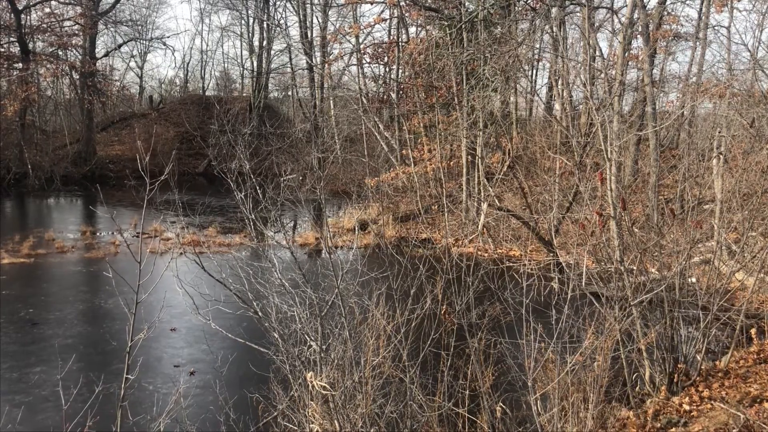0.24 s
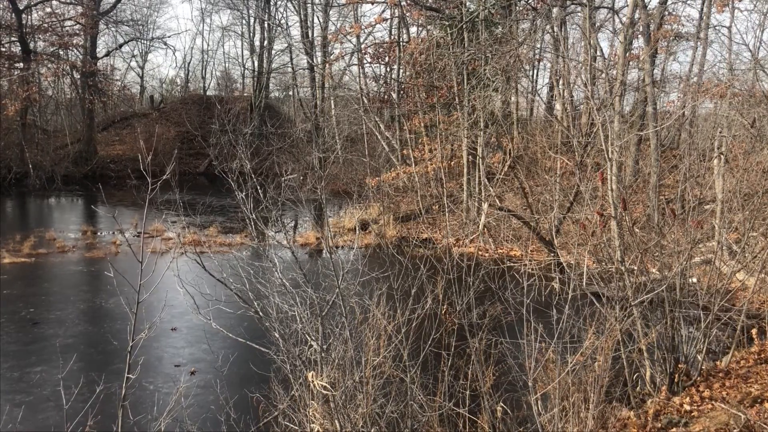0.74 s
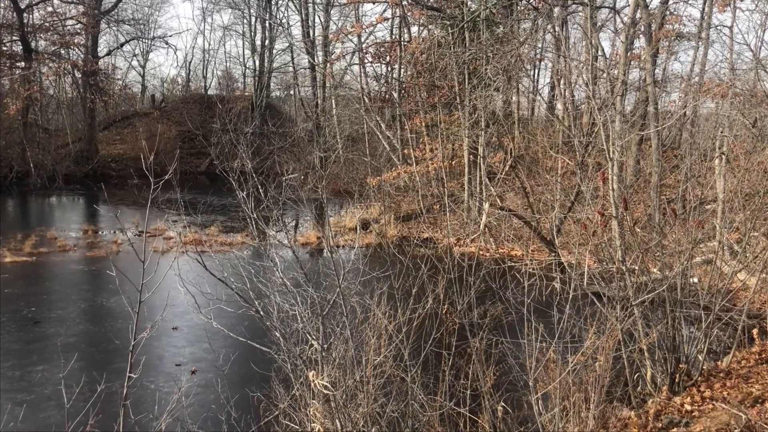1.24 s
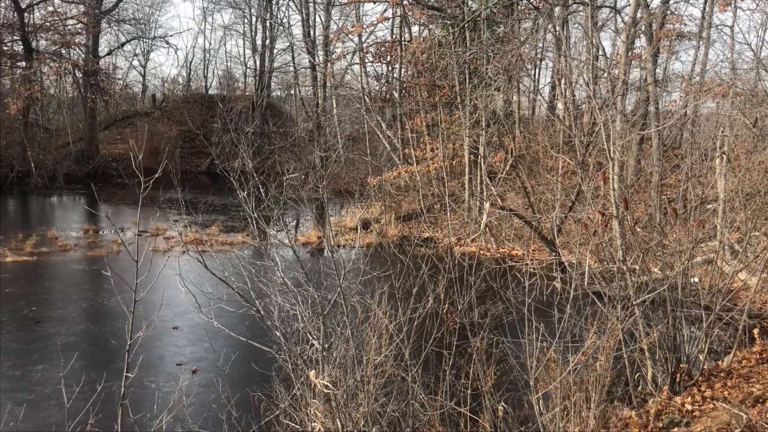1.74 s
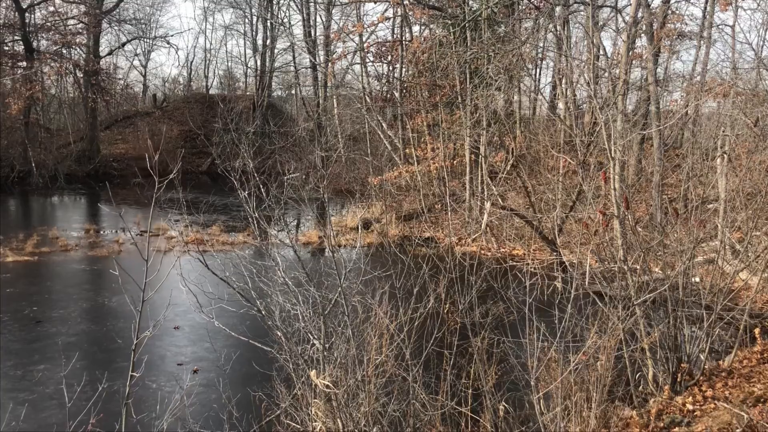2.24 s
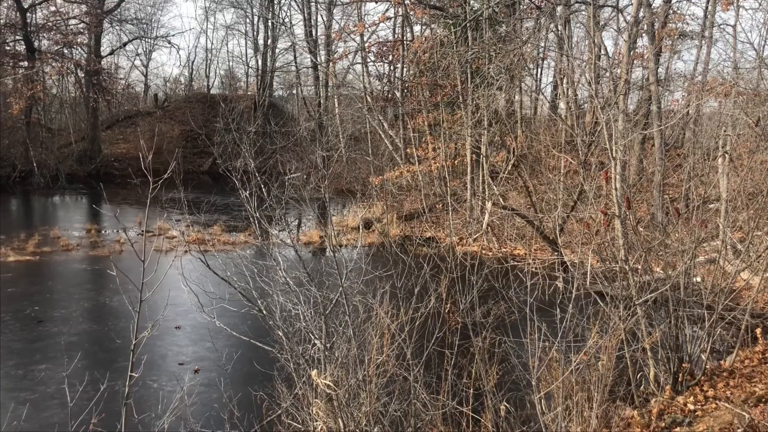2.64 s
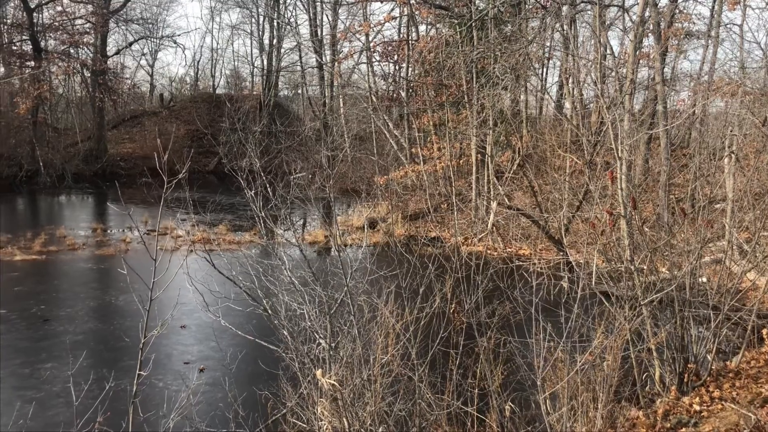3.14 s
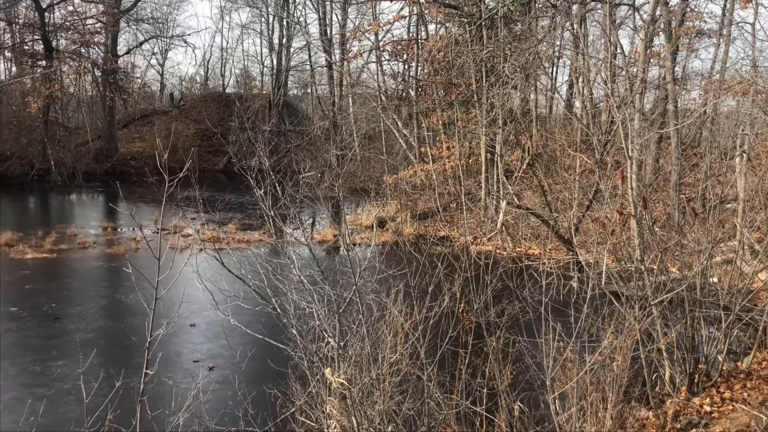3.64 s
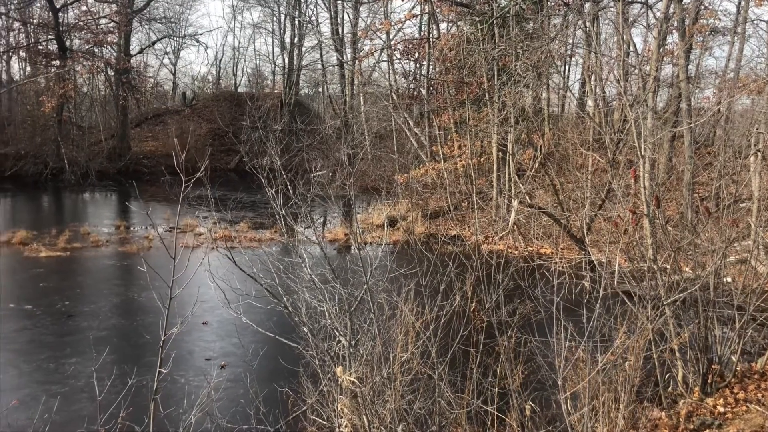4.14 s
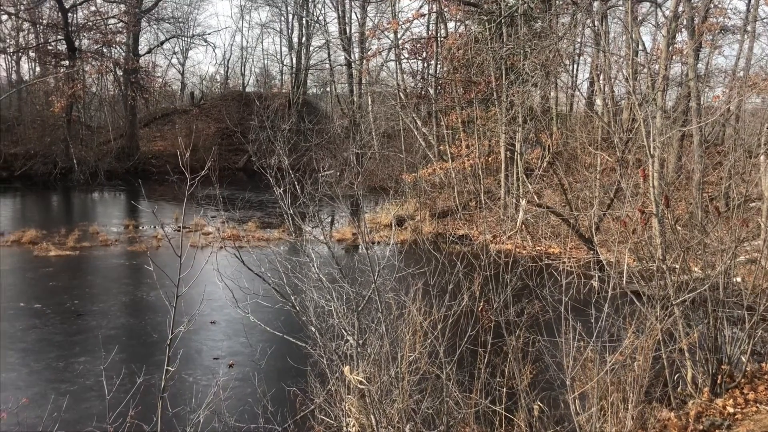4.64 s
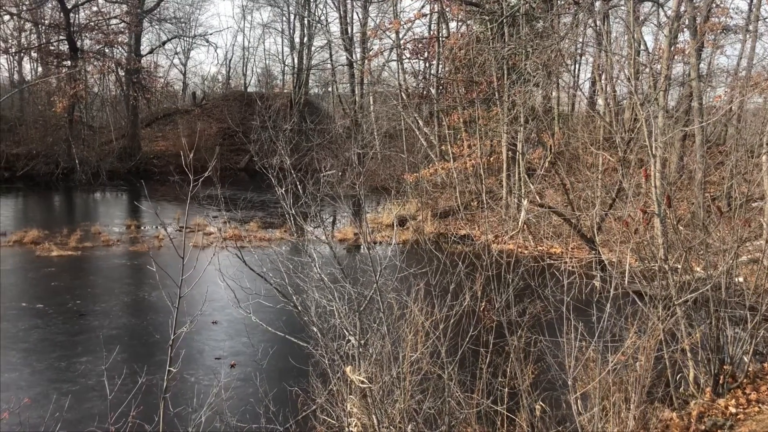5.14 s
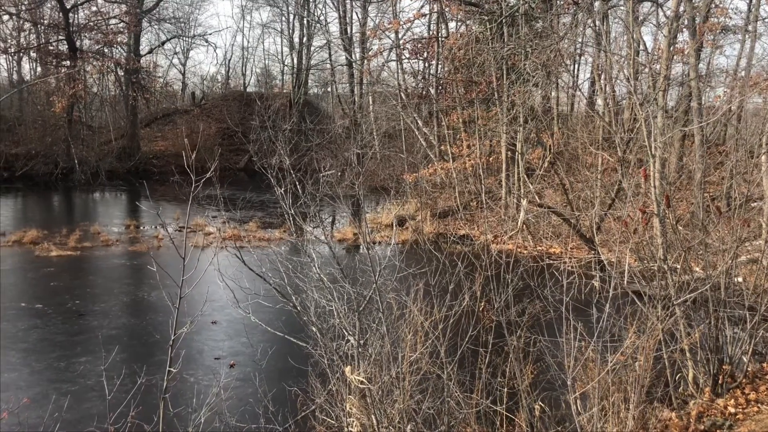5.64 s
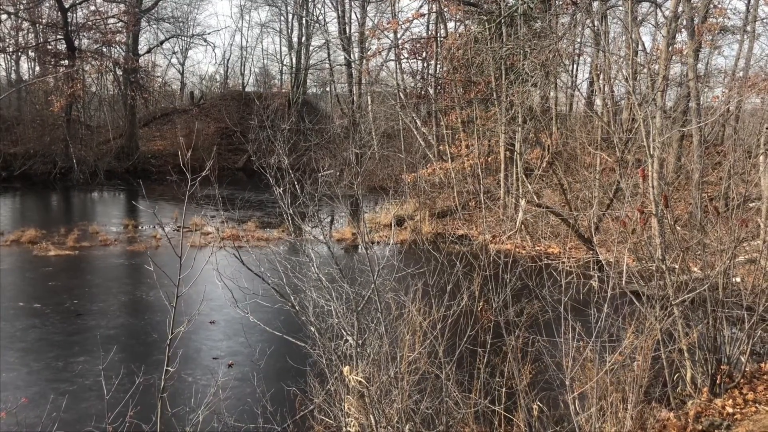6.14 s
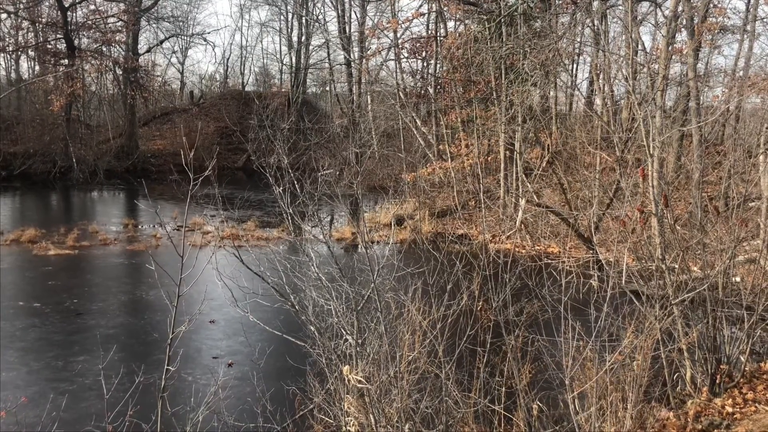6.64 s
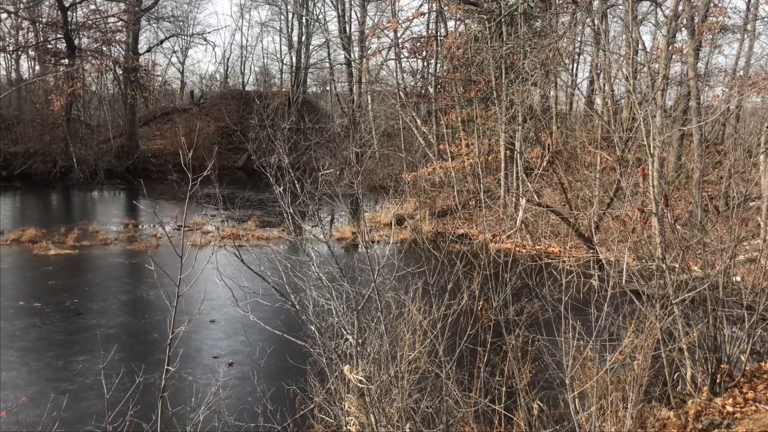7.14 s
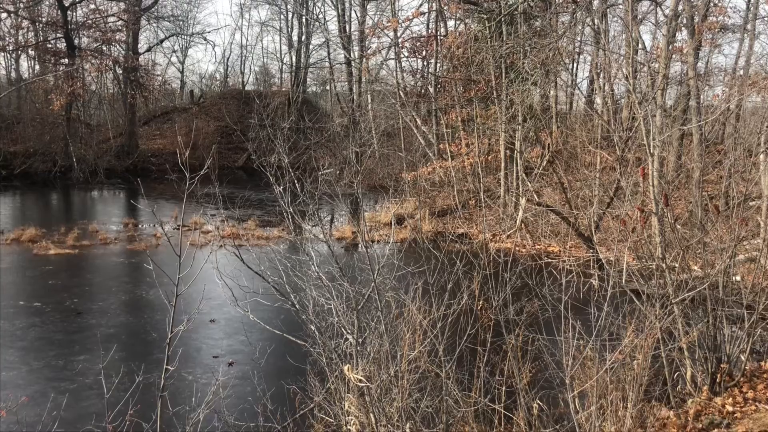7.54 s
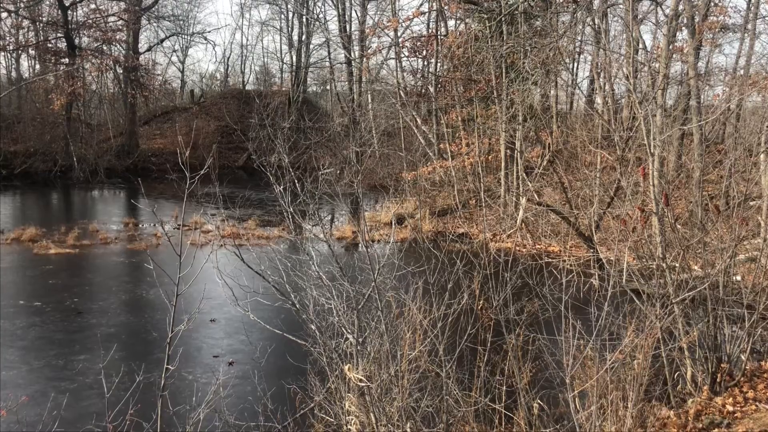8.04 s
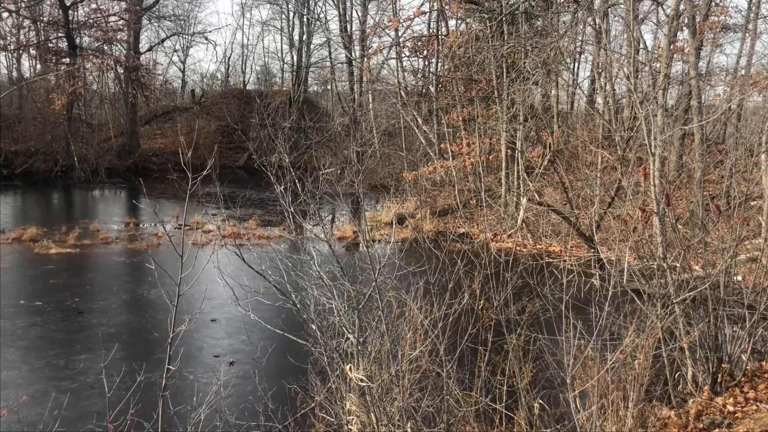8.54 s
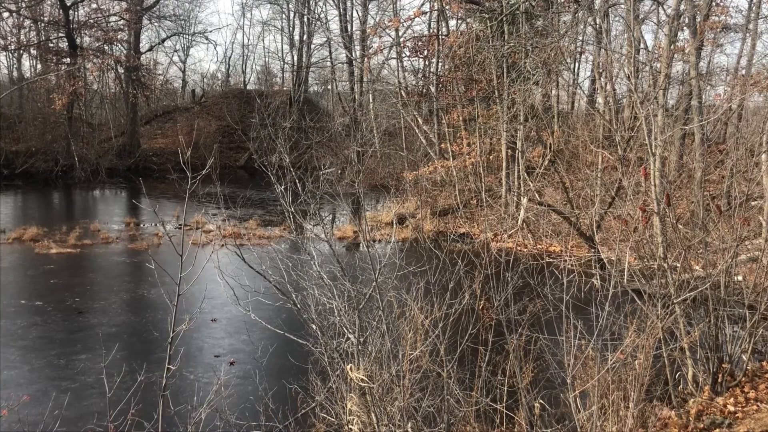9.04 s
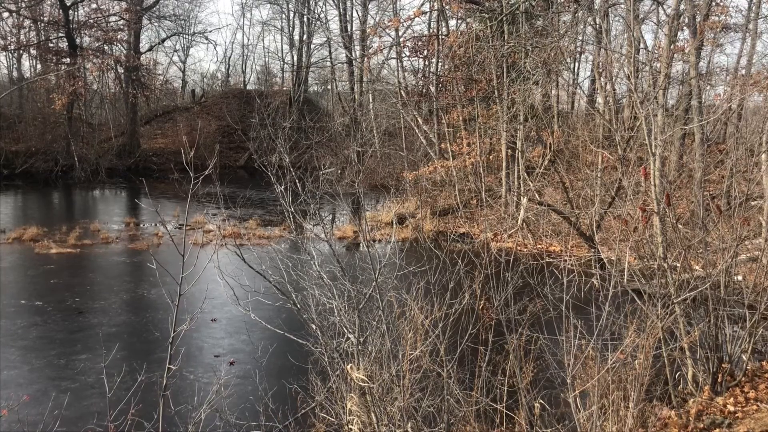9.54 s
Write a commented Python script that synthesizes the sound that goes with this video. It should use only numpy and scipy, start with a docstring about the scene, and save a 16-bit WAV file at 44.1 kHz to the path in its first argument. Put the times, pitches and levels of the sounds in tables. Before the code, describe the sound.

In bare woodland beside a pond, farther birds warble and wheeze first. A nearby nightingale then gives thin high whistles and sharp chips, nasal slurs, four looping chucks, a rapid rattle of paired clicks, and two swelling clear whistles, ending on a nasal slur. Twigs and trunks scatter short echoes; a faint chorus, low air and distant hum lie beneath. The microphone is close to the singer.

```python
"""At a woodland pond a nightingale sings close by: long whistles, nasal slurs, sharp chips, looping chucks
and a rattle of paired clicks. Its voice is a tone on a moving pitch; the clicks ring through resonances.
Other birds warble, wheeze and chatter farther off, as gliding tones and hissy rasps, over a faint chorus
of coloured noise, low air and a low distant hum. Twigs and trunks scatter every note as filtered echoes;
a limiter ducks the background under the loud ones."""
import sys
import numpy as np
from scipy import signal
from scipy.fft import rfft, irfft
from scipy.io import wavfile
from scipy.ndimage import uniform_filter1d, minimum_filter1d

SR = 44100
rng = np.random.default_rng(int(sys.argv[2]) if len(sys.argv) > 2 else 0)


def digitize_waveform(pressure):
    """Quantize a signal to 16-bit integers and store it at the path in sys.argv[1].

    Rows of a 2-D input are taken as channels; values are limited to [-1, 1].
    """
    field = np.atleast_2d(pressure).T
    bounded = np.clip(field, -1, 1)
    quanta = np.round(bounded * 32767).astype(np.int16)
    wavfile.write(sys.argv[1], SR, quanta)


N = 431738


def from_db(db):
    """Decibels to gain."""
    return 10 ** (np.asarray(db) / 20)


def add(track, start_s, sound):
    """Mix a sound into a track at a time."""
    i = int(np.clip(round(start_s * SR), 0, N - 1))
    track[i:i + len(sound)] += sound[:N - i]


def drift(rate, size):
    """Random wander about zero: normal draws, rate of them a second, joined by straight lines."""
    knots = rng.standard_normal(4096)
    return np.interp(np.arange(size) * rate / SR, np.arange(len(knots)), knots)


def coloured(spectrum):
    """Noise of rms 1 whose spectrum follows a curve drawn over log frequency."""
    hz, db = np.transpose(spectrum)
    bins_hz = np.maximum(np.fft.rfftfreq(N, 1 / SR), 1)
    bin_gain = from_db(np.interp(np.log(bins_hz), np.log(hz), db))
    noise = irfft(rfft(rng.standard_normal(N)) * bin_gain, N)
    return noise / noise.std()


def resonance(x, hz, width_hz):
    """A two-pole peak with gain 1 on top."""
    r = np.exp(-np.pi * width_hz / SR)
    zeros = np.array([1, 0, -1]) * (1 - r * r) / 2
    poles = [1, -2 * r * np.cos(2 * np.pi * hz / SR), r * r]
    return signal.lfilter(zeros, poles, x)


def progress(length_s):
    """Runs from 0 to 1 over a note."""
    return np.linspace(0, 1, max(int(length_s * SR), 16))


def gate(u, rise, fall):
    """The air valve opens and shuts over these shares of a note."""
    opening = np.sin(np.pi / 2 * np.minimum(u / rise, 1)) ** 2
    closing = np.sin(np.pi / 2 * np.minimum((1 - u) / fall, 1)) ** 2
    return opening * closing


def syrinx(hz, overtones_db):
    """A sine on a pitch path plus its harmonics, from the second up, at levels relative to it."""
    phase = 2 * np.pi * np.cumsum(hz) / SR
    tone = np.sin(phase)
    for k, db in enumerate(overtones_db, 2):
        audible = k * hz < SR / 2   # no aliasing
        tone = tone + from_db(db) * np.sin(k * phase) * audible
    return tone


def notes(table, overtones_db, swell_db, flutter, flutter_rate, strain=0):
    """Each note bends through three pitches to a crest; rasp adds pitch flutter, strain brightens loud notes."""
    out = np.zeros(N)
    for start_s, length_s, start_hz, middle_hz, end_hz, db, crest, rasp in table:
        u = progress(length_s)
        hz = np.polyval(np.polyfit([0, .5, 1], [start_hz, middle_hz, end_hz], 2), u)
        hz = hz * (1 + flutter * rasp * drift(flutter_rate, len(u)))
        pressure_db = db + np.interp(u, [0, np.clip(crest, .05, .95), 1], [-swell_db, 0, -swell_db])
        tone = syrinx(hz, [overtone + strain * pressure_db for overtone in overtones_db])
        add(out, start_s, from_db(pressure_db) * gate(u, 0.21, 0.043) * tone)
    return out


def chips(table, settle_s, fade_db, overtones_db, flutter):
    """An abrupt start, with the pitch falling quickly to rest while the level fades."""
    out = np.zeros(N)
    for start_s, length_s, start_hz, final_hz, db in table:
        u = progress(length_s)
        hz = final_hz + (start_hz - final_hz) * np.exp(-u * length_s / settle_s)
        hz = hz * (1 + flutter * drift(2500, len(u)))
        add(out, start_s, from_db(db - fade_db * u) * gate(u, 0.1, 0.083) * syrinx(hz, overtones_db))
    return out


def whistles(level_db, flutter, second_db, third_db):
    """A near sine that slides onto its pitch, wavers while it is soft and steadies as it swells."""
    # how each of two long whistles swells, one table each: time_s, relative level_db
    swells = [
        [(8.37, -36), (8.394, -30.5), (8.416, -36.5), (8.566, -7.5), (8.61, -3.5), (8.645, -29.5)],
        [(8.9, -39.5), (8.918, -21), (8.996, -10), (9.132, -5), (9.2, -15), (9.21, -19)],
    ]
    # the first ends with a lift, the second droops: bend_hz
    end_bends = [60, -110]
    start_hz, rest_hz, settle_s = 4570, 4154, .036
    out = np.zeros(N)
    for swell, bend_hz in zip(swells, end_bends):
        time_s, db = np.transpose(swell)
        length_s = time_s[-1] - time_s[0]
        u = progress(length_s)
        t = u * length_s
        db = np.interp(time_s[0] + t, time_s, db)
        hz = rest_hz + (start_hz - rest_hz) * np.exp(-t / settle_s) + bend_hz * u ** 8
        softness = 1.2 - from_db(db - db.max())
        hz = hz * (1 + flutter * softness * drift(700, len(u)))
        tone = syrinx(hz, [second_db, third_db])
        add(out, time_s[0], from_db(db + level_db) * gate(u, .04, 0.044) * tone)
    return out


def slurs():
    """Nasal notes, rich in overtones, that bend, swell to a crest and flutter."""
    # start_s, length_s, start_hz, middle_hz, end_hz, level_db, crest place (0-1), rasp (0-1)
    slur_notes = [(3.765, 0.14, 1564, 1655, 1576, -22.5, 0.83, 0.19),
                  (3.88, 0.095, 1560, 1526, 1444, -15, 0.48, 0.12),
                  (4.022, 0.075, 1605, 1359, 1359, -4.5, 0.59, 0.25),
                  (9.671, 0.031, 2114, 1580, 1630, -15, 0.03, 0.53),
                  (9.695, 0.16, 1485, 1495, 1454, -18.5, .35, 0.11)]
    return notes(slur_notes, overtones_db=[-16.0, -32, -38, -21, -28.5, -23.5], swell_db=12.5,
                 flutter=0.12, flutter_rate=930)


def sharp_chips():
    """Sharp chips that drop onto a pitch."""
    # start_s, length_s, start_hz, final_hz, level_db
    chip_notes = [(2.861, 0.029, 3760, 3194, 9.5), (3.455, 0.0333, 3790, 3103, 9)]
    return chips(chip_notes, settle_s=0.0019, fade_db=10.5, overtones_db=[-36, -21.5, -46, -45],
                 flutter=0.012)


def chucks(dive_s, climb_at_s, climb_s, climb_db, second_at_s):
    """The same loop every time: a steep fading dive, a swelling climb, the dive again."""
    # start_s, relative level_db
    loop_starts = [(4.9856, 3.5), (5.2657, 3), (5.542, 2), (5.8094, 3.5)]
    out, u, v = np.zeros(N), progress(dive_s), progress(climb_s)
    dive_hz = np.interp(u, [0, .07, .2, .45, 1], [4330, 3500, 3195, 2547, 1140])
    dive_hz = dive_hz * (1 + 0.01 * drift(2490, len(u)))
    dive_db = np.interp(u, [0, .14, .45, 1], [-16.5, 6, -10.5, -30.5])
    dive = syrinx(dive_hz, overtones_db=[-36, -19 + 0.1 * dive_db, -44])
    dive = from_db(dive_db) * gate(u, 0.065, 0.026) * dive
    climb_hz = np.interp(v, [0, .35, .8, 1], [1576, 1995, 2653, 2560])
    climb_hz = climb_hz * (1 + 0.035 * drift(1155, len(v)))
    climb = gate(v, 0.32, 0.081) * syrinx(climb_hz, overtones_db=[-28, -31, -34])
    for start_s, db in loop_starts:
        add(out, start_s, from_db(db) * dive)
        add(out, start_s + climb_at_s, from_db(db + climb_db) * climb)
        add(out, start_s + second_at_s, from_db(db) * dive)
    return out


def hoots(crest, rasp):
    """A low, nearly pure note with a lift at its end, closing a chuck."""
    # start_s, level_db
    hoot_starts = [(5.091, -8), (5.376, -12), (5.65, -12.5)]
    length_s, pitch_hz, lift_ratio = 0.034, 1071, 1.09
    rows = [(start_s, length_s, pitch_hz, pitch_hz, pitch_hz * lift_ratio, db, crest, rasp)
            for start_s, db in hoot_starts]
    return notes(rows, overtones_db=[-35], swell_db=9, flutter=.028, flutter_rate=360)


def click_pairs(count=15):
    """Times and levels of the rattle's weak-strong click pairs; both gaps widen as the run slows."""
    run_start_s, period_s, slowing_s, pair_gap_s = 5.9709, .0782, .00005, .0286
    first_db, second_db, tiring_db_per_s = -6, -1.5, 1   # only the first click of a pair tires
    k = np.arange(count)
    elapsed_s = k * (period_s + slowing_s * k)
    first = [(run_start_s + t, first_db - tiring_db_per_s * t) for t in elapsed_s]
    second_s = elapsed_s + pair_gap_s + 2 * slowing_s * k
    return first + [(run_start_s + t, second_db) for t in second_s]


def rattle(click_s, start_hz, end_hz, rasp, crack_db, force, level_db, pitch_spread):
    """Each click, harsh falling cycles and a crack of air, brighter when forced, rings throat and beak."""
    # throat and beak resonances: centre_hz, width_hz, level_db
    beak_peaks = [(3280, 680, -1.5), (4002, 84, 9), (5240, 590, -3), (6330, 200, -1), (7290, 410, 4.5),
                  (9800, 840, -2), (12800, 650, -18.5)]
    out, u = np.zeros(N), progress(click_s)
    for s, db in click_pairs():
        hz = start_hz + (end_hz - start_hz) * u
        hz = hz * (1 + pitch_spread * rng.standard_normal() + rasp * drift(3900, len(u)))
        crack = from_db(crack_db + force * db) * rng.standard_normal(len(u))
        click = syrinx(hz, overtones_db=[-5]) + crack
        add(out, s - .0006, from_db(db + level_db) * gate(u, .07, 0.71) * click)
    # a small beak radiates no bass
    out = signal.sosfilt(signal.butter(4, 2200, "high", fs=SR, output="sos"), out + 1e-18)
    # neighbouring resonances take opposite signs
    return sum((-1) ** k * from_db(db) * resonance(out, hz, width_hz)
               for k, (hz, width_hz, db) in enumerate(beak_peaks))


def seets(fade_db, flutter_start, flutter_end, overtones_db):
    """A very high, thin held whistle that fades and grows unsteady."""
    # start_s, level_db
    seet_starts = [(2.622, -13.5), (3.212, -11.5)]
    length_s, pitch_hz = 0.16, 6465
    out, u = np.zeros(N), progress(length_s)
    for start_s, db in seet_starts:
        flutter = flutter_start + (flutter_end - flutter_start) * u
        hz = pitch_hz * (1 + flutter * drift(900, len(u)))
        add(out, start_s, from_db(db - fade_db * u) * gate(u, 0.079, 0.059) * syrinx(hz, overtones_db))
    return out


def tsiks():
    """Two tiny chips in quick succession, the second weaker, with the third harmonic loudest."""
    # start_s, level_db of the fundamental
    tsik_starts = [(4.228, -29), (4.789, -30.5)]
    length_s, start_hz, end_hz, gap_s, second_db = 0.019, 2740, 2502, 0.02, -2.5
    rows = [(start_s + k * gap_s, length_s, start_hz, end_hz, db + k * second_db)
            for start_s, db in tsik_starts for k in range(2)]
    return chips(rows, settle_s=0.0026, fade_db=19.5, overtones_db=[24.4, 37.5, 17.6, 2.5], flutter=0.052)


def mews():
    """Low bending notes with a strong second harmonic."""
    # start_s, length_s, start_hz, middle_hz, end_hz, level_db, crest place (0-1), rasp (0-1)
    mew_notes = [(4.485, .18, 667, 767, 742, -27, 0.9, .1), (4.665, 0.023, 725, 700, 610, -30, .4, .2),
                 (9.405, .059, 633, 807, 725, -36.5, 0.63, .18),
                 (9.465, 0.022, 734, 663, 585, -31, 0.2, .28)]
    return notes(mew_notes, overtones_db=[-3, -17, -14], swell_db=7, flutter=0.032, flutter_rate=650)


def warble():
    """Short arched glides among the trees, cresting early, rougher the faster they sweep."""
    # start_s, length_s, start_hz, end_hz, level_db
    glides = [(.175, 0.037, 3840, 3530, -29), (0.318, .12, 2820, 4070, -33),
              (0.448, 0.034, 3900, 3100, -29), (0.642, .063, 4360, 3450, -22),
              (0.999, 0.038, 2140, 2560, -30.5), (1.045, 0.039, 2100, 2990, -24.5),
              (1.084, 0.045, 3690, 4170, -19), (1.155, 0.037, 3575, 3080, -12),
              (1.179, 0.1, 2047, 1840, -39), (1.312, 0.064, 2556, 2686, -25),
              (1.366, .062, 2667, 3230, -13.5), (1.446, 0.035, 3790, 2410, -17),
              (1.522, 0.091, 3328, 2926, -11.5), (1.727, 0.029, 4120, 3600, -14.5),
              (1.759, .04, 3680, 3640, -18.5), (1.925, 0.049, 3670, 3010, -11),
              (1.989, 0.019, 3190, 3343, -7), (2.011, 0.075, 3380, 3110, -13), (2.088, .09, 3152, 3000, -8),
              (2.091, 0.08, 3973, 3440, -15), (2.159, 0.079, 2983, 2866, -1.5),
              (2.77, 0.22, 1854, 1776, -34), (3.018, 0.064, 3284, 2840, -21),
              (3.846, 0.037, 3196, 3364, -16.5), (3.892, 0.11, 3377, 3064, -16.5),
              (4.165, 0.1, 3513, 3650, -20.5), (4.288, 0.083, 3710, 3780, -17),
              (4.44, 0.053, 3103, 3264, -12), (4.493, 0.068, 3323, 3120, -11.5),
              (4.58, 0.068, 3090, 3335, -23), (4.626, 0.072, 2464, 2250, -29),
              (4.74, 0.078, 3970, 3745, -25), (6.05, 0.3, 1970, 2230, -42), (6.62, 0.22, 2800, 2334, -33.5),
              (7.167, 0.13, 2165, 2900, -37.5), (7.283, .21, 2077, 1942, -36.5),
              (7.38, 0.033, 3450, 3170, -18), (7.404, 0.069, 3640, 4130, -21.5),
              (7.547, 0.1, 2640, 3165, -18.5), (7.737, .035, 3280, 3124, -14.5),
              (7.771, 0.054, 3316, 2774, -13), (7.934, 0.018, 3470, 3760, -20),
              (8.057, 0.072, 3560, 4090, -17), (8.101, 0.041, 3410, 2933, -9.5),
              (8.156, 0.065, 3450, 3285, -13), (8.173, .15, 2000, 1796, -37),
              (8.252, 0.059, 4020, 3310, -11), (8.385, 0.035, 2784, 2732, -13.5),
              (8.444, .1, 2530, 2794, -29.5), (8.607, 0.036, 3560, 2470, -17.5),
              (8.858, 0.018, 4020, 3890, -20), (8.894, 0.019, 3385, 3100, -13),
              (8.939, 0.082, 3000, 3176, -26), (9.189, 0.05, 2750, 3100, -33.5)]
    arch, crest, base_rasp, rasp_per_octave_per_s = .012, 0.34, 0.17, 0.04
    rows = []
    for start_s, length_s, start_hz, end_hz, db in glides:
        middle_hz = (1 + arch) * (start_hz + end_hz) / 2
        octaves_per_s = abs(np.log2(end_hz / start_hz)) / length_s
        rasp = base_rasp + rasp_per_octave_per_s * octaves_per_s
        rows.append((start_s, length_s, start_hz, middle_hz, end_hz, db, crest, rasp))
    return notes(rows, overtones_db=[-41, -15.5, -59.5, -39.5], swell_db=6, flutter=0.06,
                 flutter_rate=800, strain=2.0)


def wheezes(hiss_db, hiss_s, voice_db, hiss_pitch_hz, hiss_rough):
    """A drooping note heard mostly by its overtones breaks up into a falling, hissy rasp."""
    # start_s, length_s, relative level_db
    wheeze_notes = [(0.154, 0.095, -31), (0.759, 0.1, -30.5), (1.06, .11, -29), (1.891, 0.096, -34),
                    (2.214, 0.078, -33.5), (2.519, 0.13, -36.5), (3.49, 0.094, -35.5)]
    # spectrum of the hiss: frequency_hz, relative level_db
    hiss_spectrum = [(1800, -31), (3500, 4), (4600, 5.5), (6000, -7), (7400, 15), (9500, -7),
                     (11500, -30.5), (14000, -29), (16000, -40)]
    voice, air = np.zeros(N), np.zeros(N)
    v = progress(hiss_s)
    puff = gate(v, .3, .7)
    for start_s, length_s, db in wheeze_notes:
        u = progress(length_s)
        hz = np.interp(u, [0, .35, .8, 1], [2430, 2600, 2450, 2100]) * (1 + .012 * drift(900, len(u)))
        droop = syrinx(hz, overtones_db=[3.5, 5, -11.5, -19])
        # the level climbs 5 dB over the note
        add(voice, start_s, from_db(db + voice_db + 5 * (u - 3.5)) * gate(u, .08, 0.21) * droop)
        hz = hiss_pitch_hz * (1 - 0.21 * v) * (1 + hiss_rough * drift(2000, len(v)))
        rasp = syrinx(hz, overtones_db=[-1, 10.5, 0.5, -25, -11])
        add(voice, start_s + .68 * length_s, from_db(db - 14) * puff * rasp)
        add(air, start_s + 0.69 * length_s, from_db(db + hiss_db) * puff)
    return voice + air * coloured(hiss_spectrum)


def chatter(low_hz, high_hz, level_db, shortest_s, spread_s, glide, spread_db, tilt_db, count):
    """Each bout scatters faint rough chirps at random, the low ones weaker."""
    # bouts of faint chatter from deep in the wood: start_s, end_s, relative level_db
    bouts = [(0.099, 1.3, -27.5), (1.294, 4.998, -28.5), (7.15, 9, -26)]
    rows = []
    for start_s, end_s, db in bouts:
        for when, length, pitch, slope, loud in rng.random((count, 5)):
            hz = low_hz + (high_hz - low_hz) * pitch
            bend = glide * (slope - .5)
            chirp_db = db + level_db - spread_db * loud - tilt_db * (1 - pitch)
            rows.append((start_s + when * (end_s - start_s), shortest_s + spread_s * length,
                         hz * (1 - bend), hz, hz * (1 + bend), chirp_db, .5, 1))
    return notes(rows, overtones_db=[], swell_db=9.5, flutter=0.02, flutter_rate=700)


def background():
    """Far birds blur into a shimmering band of noise above the low air and a wavering hum."""
    # spectrum of the far birds: frequency_hz, relative level_db
    chorus_spectrum = [(1000, -92), (1700, -61), (1850, -3), (2230, -16.5), (2820, 3), (3070, -17.5),
                       (3190, 8.5), (3700, -3), (4030, 9.5), (4600, -28), (5240, -15.5), (5920, -29.5),
                       (7210, -12.5), (9800, -13.5), (11300, -42.5), (13500, -36.5), (16000, -64.5)]
    # spectrum of the low air: frequency_hz, relative level_db
    air_spectrum = [(15, -45.5), (25, -19.5), (51, -0.5), (86, -19.5), (103, -7), (125, 1), (171, -7.5),
                    (386, -17.5), (437, -24.5), (460, -19.5), (600, -1), (796, -1), (900, -13.5), (1090, 2),
                    (1700, -16.5), (2210, -76), (3740, -120)]
    # distant hum: pitch_hz, level_db, both before their wander
    hum_tones = [(120, -54), (468, -65.5)]
    # slow gain riding on the background, sinking under loud song; centred and scaled below:
    # time_s, relative gain_db
    gain_ride = [(0.0, -47), (0.38, -44.5), (4.82, -52), (5.75, -58), (6.9, -58), (7.91, -47),
                 (8.86, -51.5), (9.03, -59.5), (9.79, -56)]
    air_share, chorus_share = 0.7, 0.59   # shares of the gain ride each takes
    chorus = from_db(-36 + 2.2 * drift(24, N)) * coloured(chorus_spectrum)
    air = from_db(-46) * coloured(air_spectrum)
    hum = np.zeros(N)
    for hz, db in hum_tones:
        level = from_db(db + 1.2 * drift(6.0, N))
        hum += level * np.sin(2 * np.pi * np.cumsum(hz + 3 * drift(16, N)) / SR)
    ride_db = np.interp(np.arange(N) / SR, *np.transpose(gain_ride))
    ride_db = ride_db - ride_db.mean()
    return chorus * from_db(chorus_share * ride_db) + (air + hum) * from_db(air_share * ride_db)


def woods(x, twigs_db, trunks_db, tail_db, ground_db=-7, ground_s=0.003,
          twigs_t60=0.065, trunks_t60=0.23, tail_t60=0.78):
    """Direct sound, a bounce off the ground, scatter from twigs and trunks, and a duller far tail."""
    t = np.arange(SR) / SR
    response = np.zeros(SR)
    response[0] = 1
    response[int(ground_s * SR)] += from_db(ground_db)
    # level_db, t60_s, first_s (arrival), cut_hz (treble limit)
    layers = [(twigs_db, twigs_t60, .004, 13000),
              (trunks_db, trunks_t60, .015, 9000),
              (tail_db, tail_t60, .06, 4200)]
    for db, t60_s, first_s, cut_hz in layers:
        echoes = rng.standard_normal(SR) * (t > first_s) * from_db(-60 * t / t60_s)
        echoes = signal.sosfilt(signal.butter(2, cut_hz, fs=SR, output="sos"), echoes + 1e-18)
        response += from_db(db) * echoes / np.sqrt(np.sum(echoes ** 2))
    return signal.fftconvolve(x, response)[:N]


def scene():
    """The near singer and the farther birds in the same wood; each kind of note carries its own way."""
    pure = whistles(level_db=4.5, flutter=0.011, second_db=-25, third_db=-53)
    tones = slurs() + mews() + hoots(crest=.62, rasp=.06)
    thin = seets(fade_db=4.5, flutter_start=0.01, flutter_end=0.025, overtones_db=[-23])
    sharp = sharp_chips() + tsiks()
    loops = chucks(dive_s=0.025, climb_at_s=.034, climb_s=.024, climb_db=-5.5, second_at_s=.0587)
    clicks = rattle(click_s=0.00374, start_hz=4570, end_hz=2980, rasp=0.061, crack_db=5, force=0.99,
                    level_db=-1.5, pitch_spread=0.039)
    far = warble() + wheezes(hiss_db=3, hiss_s=0.099, voice_db=4, hiss_pitch_hz=2564, hiss_rough=.06)
    farthest = chatter(low_hz=1952, high_hz=4210, level_db=1.5, shortest_s=0.018, spread_s=0.05,
                       glide=.35, spread_db=11.5, tilt_db=10.5, count=30)
    farthest += chatter(low_hz=4595, high_hz=5620, level_db=-15.5, shortest_s=.03, spread_s=0.049,
                        glide=.12, spread_db=7.5, tilt_db=0.5, count=6)
    sound = woods(pure, ground_db=-32, twigs_db=-9, trunks_db=-15, tail_db=-34.5)
    sound += woods(tones, ground_db=-35, twigs_db=-15, trunks_db=-20.5, tail_db=-30.5)
    sound += woods(thin, ground_db=-9, twigs_db=-6, trunks_db=-12, tail_db=-42)
    sound += woods(sharp, ground_db=-13, twigs_db=-7, trunks_db=-7.5, tail_db=-28)
    sound += woods(loops, ground_db=-9.5, twigs_db=-5.5, trunks_db=-8, tail_db=-29, trunks_t60=0.2)
    sound += woods(clicks, ground_db=-3, twigs_db=-3.0, trunks_db=-12.5, tail_db=-43,
                   twigs_t60=0.081, trunks_t60=0.24)
    sound += woods(far, ground_db=-2, twigs_db=-8.5, trunks_db=-7, tail_db=-26.5)
    sound += woods(farthest, ground_db=-6.5, twigs_db=-3.5, trunks_db=-0.5, tail_db=-20.5)
    return (sound + background())[None]


def record(dry, release_db_per_s=90):
    """A look-ahead limiter clamps the peaks and recovers at a steady rate; then the top is cut."""
    ceiling_db, cutoff_hz = -.9, 16500
    over_db = np.maximum(20 * np.log10(np.abs(dry[0]) + 1e-9) - ceiling_db, 0)
    recovery_db = release_db_per_s * np.arange(N) / SR
    cut_db = np.maximum.accumulate(over_db + recovery_db) - recovery_db
    # centred windows of about 2 ms give the look-ahead and round its corners
    gain_db = uniform_filter1d(minimum_filter1d(-cut_db, size=89), size=89)
    low_pass = signal.cheby2(12, 40, cutoff_hz, fs=SR, output="sos")
    return signal.sosfiltfilt(low_pass, dry * from_db(gain_db))


dry = scene()
out = record(dry)
digitize_waveform(out)
```